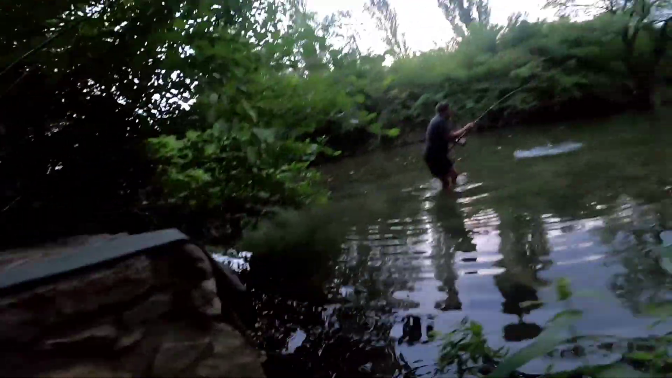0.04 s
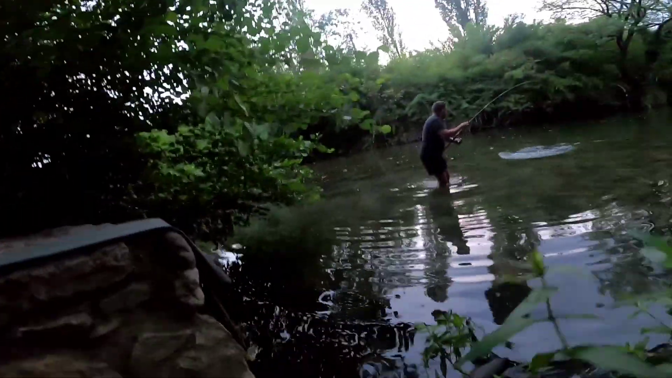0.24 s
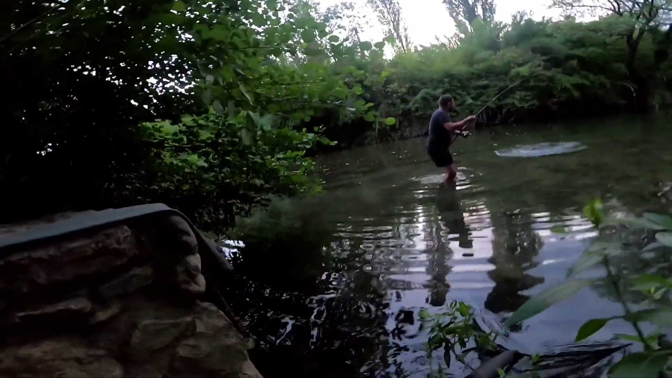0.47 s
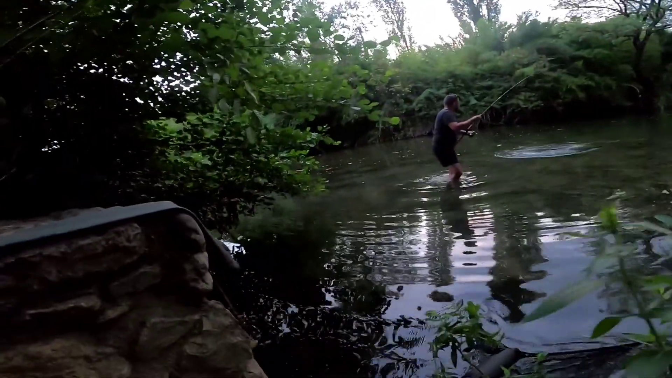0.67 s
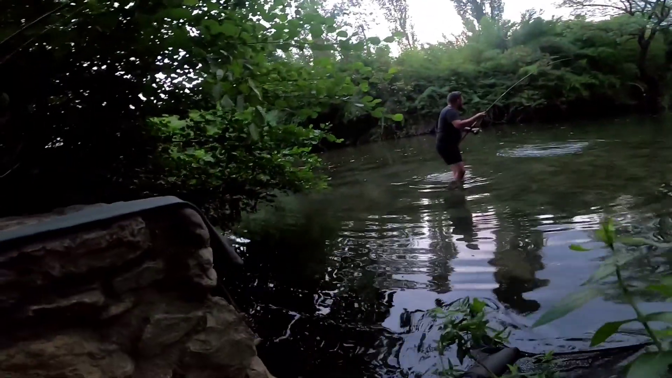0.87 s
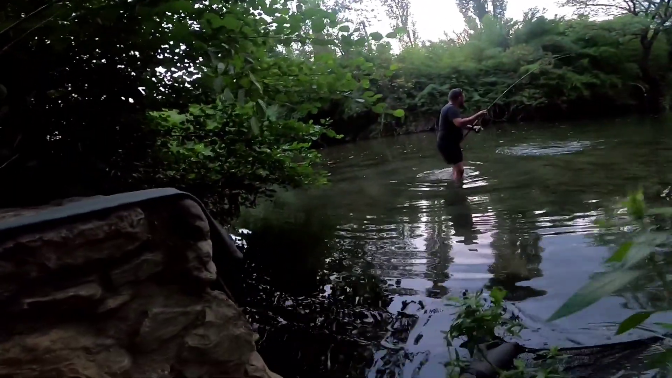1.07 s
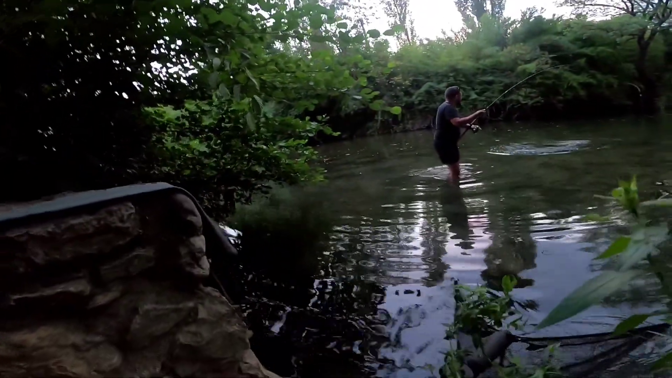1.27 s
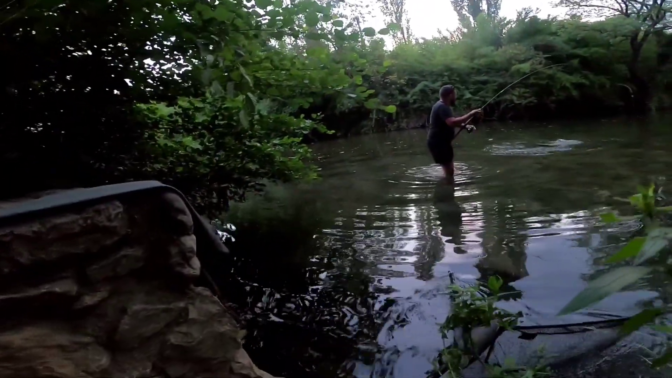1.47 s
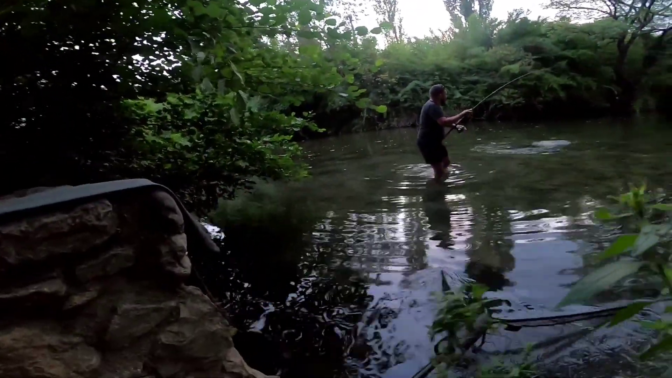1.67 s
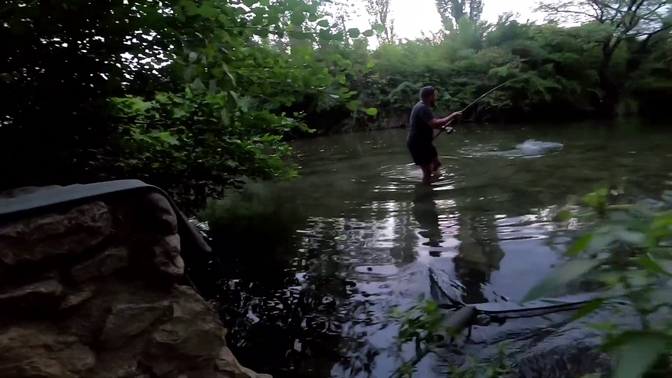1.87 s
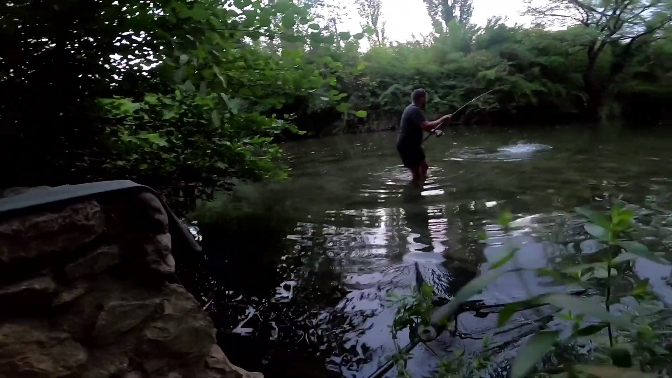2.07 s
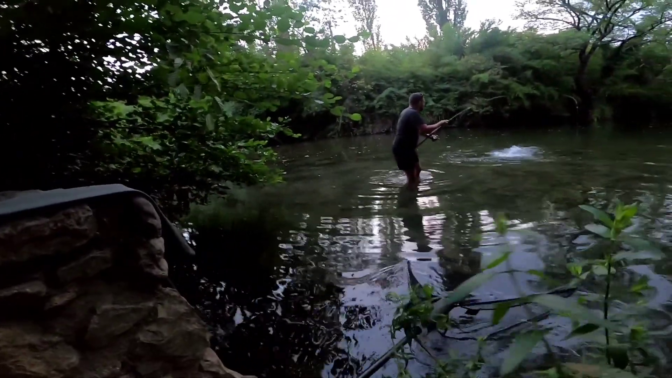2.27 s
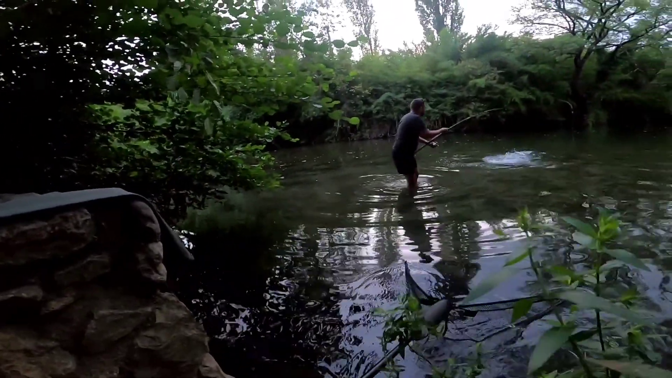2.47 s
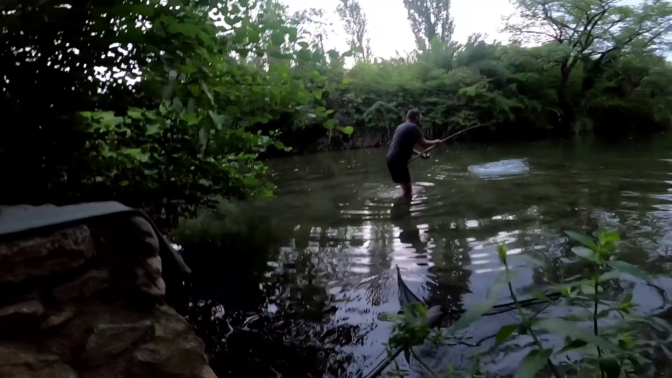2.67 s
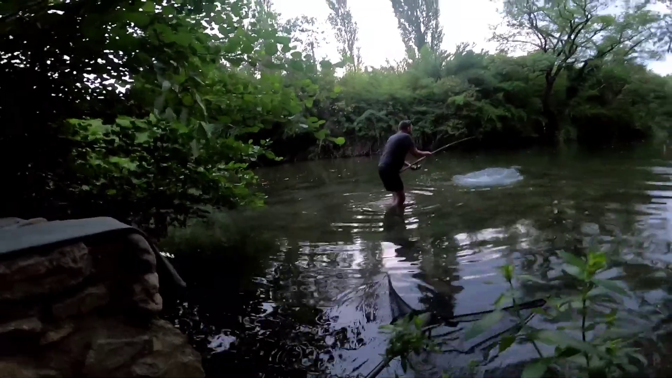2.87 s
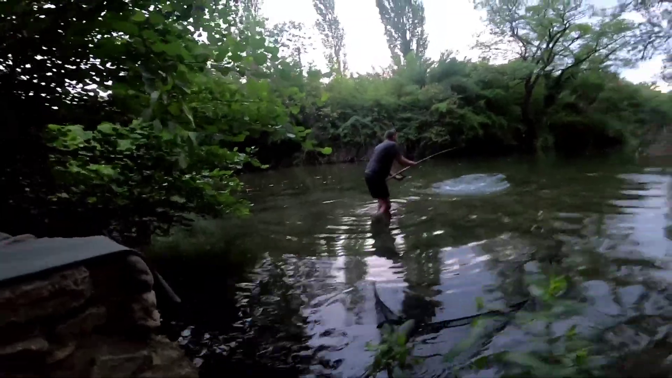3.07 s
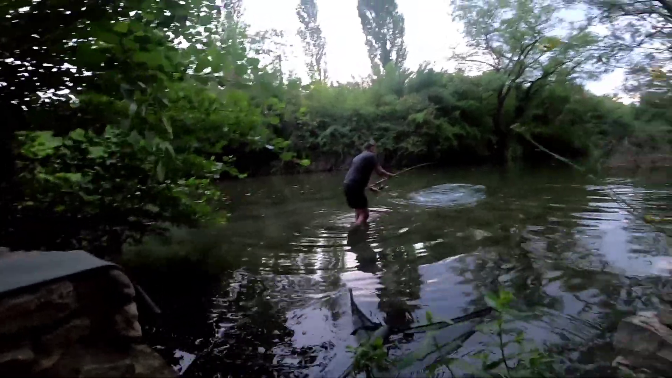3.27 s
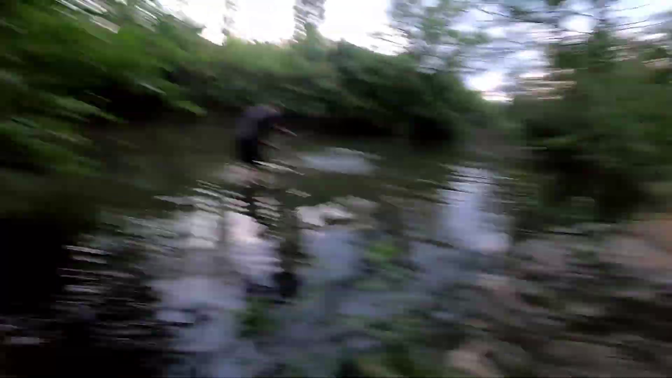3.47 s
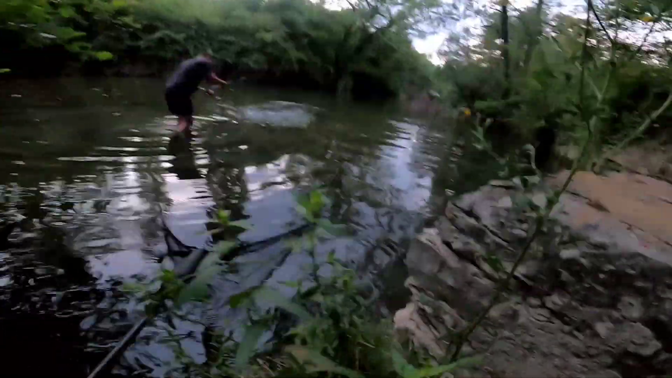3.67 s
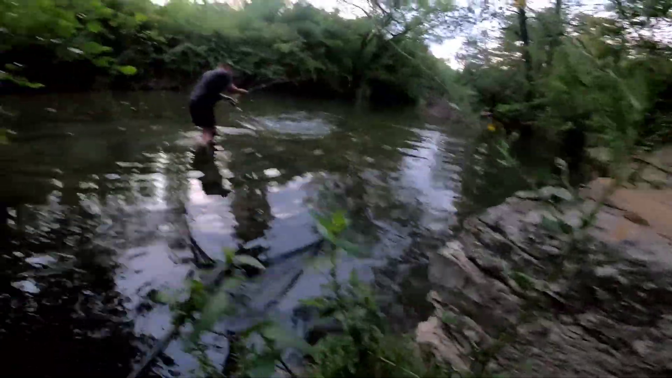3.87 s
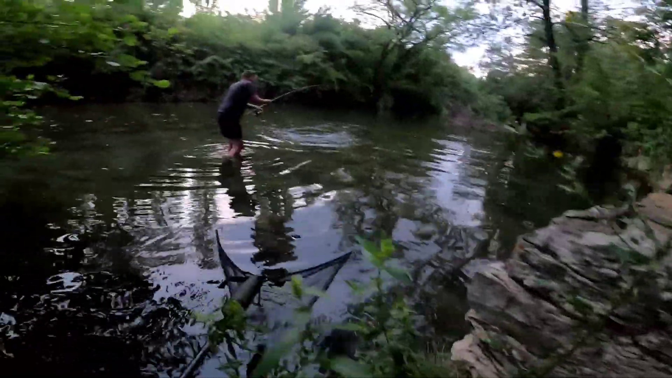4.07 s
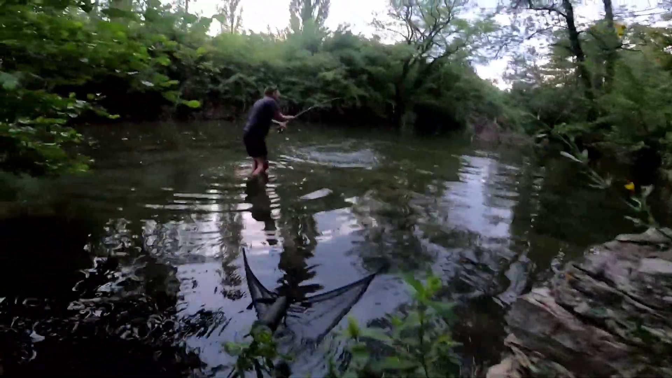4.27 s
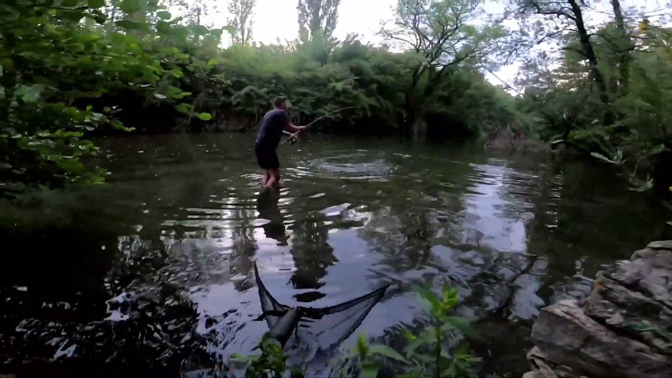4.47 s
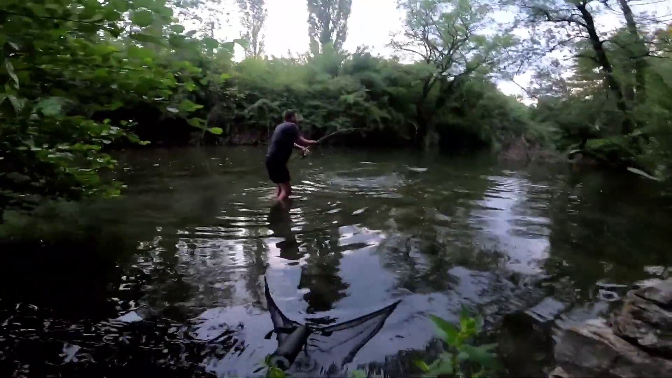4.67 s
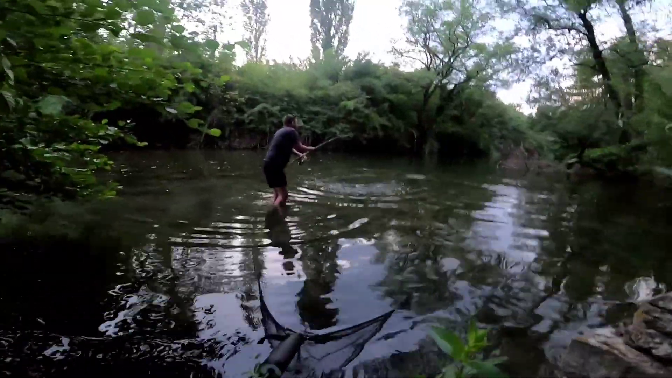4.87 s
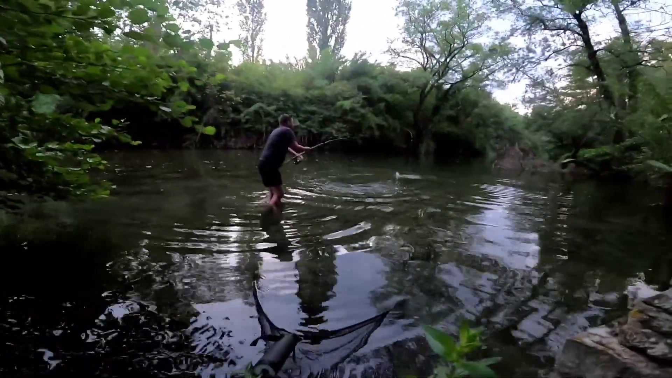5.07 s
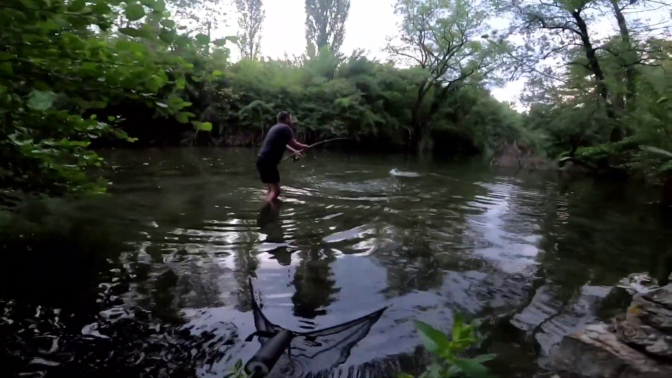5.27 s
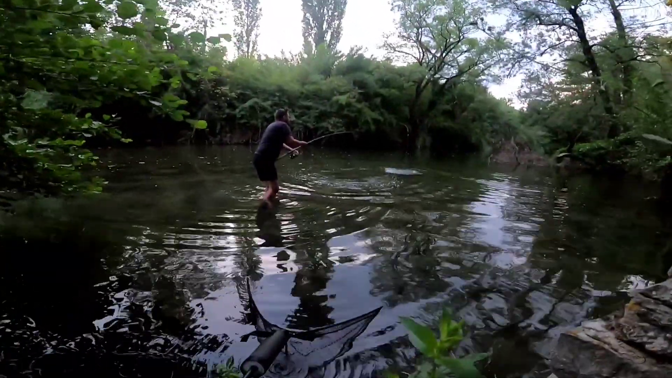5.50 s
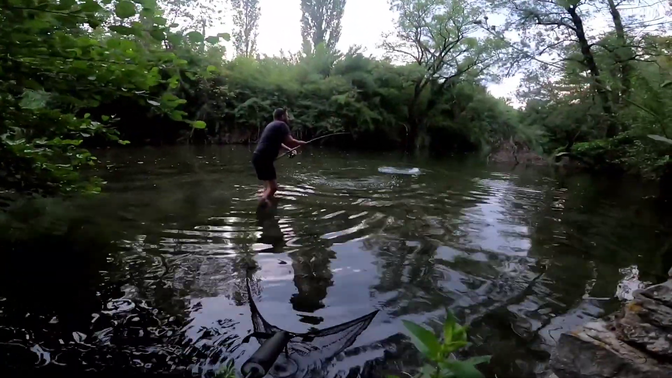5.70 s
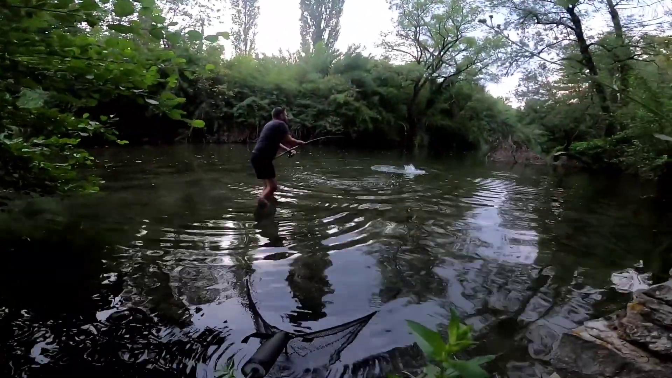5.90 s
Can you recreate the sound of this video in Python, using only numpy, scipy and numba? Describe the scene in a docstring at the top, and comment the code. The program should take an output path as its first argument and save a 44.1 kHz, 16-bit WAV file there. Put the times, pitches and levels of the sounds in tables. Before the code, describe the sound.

Outdoors on a wooded riverbank, a hooked fish churns the water: light splashes and plops first, a heavy thrash with deep gulps around two seconds, a lull of insects, then renewed splashing with brief reel clicks. Rhythmic cicada phrases come first from the right, later in front. Wind thumps the stereo microphone, mainly early on.

```python
"""A hooked fish thrashes in a river pool by a wading angler: swarms of ringing bubbles follow surges and plunges,
with single plops and low gulps on top. Beside the pool a reel's ratchet slips: clicks ring its spool.
Wind noise rumbles on the microphone ports and short knocks tick on the housing.
Two cicadas on the bank sing in short phrases: clicks through body resonances. Farther off are a droning cicada,
a ticking bush cricket, two choirs of buzzing noise bands and a flickering valley bed."""
import sys
import numpy as np
from scipy import signal
from scipy.io import wavfile
from scipy.ndimage import uniform_filter1d
from numba import njit

SR = 44100
rng = np.random.default_rng(int(sys.argv[2]) if len(sys.argv) > 2 else 0)


def file_out(sig):
    """Save sig as 16-bit WAV at sys.argv[1]."""
    # one column per channel
    cols = np.atleast_2d(sig).T
    # limit, then scale
    lim = np.clip(cols, -1, 1)
    pcm = np.round(lim * 32767).astype(np.int16)
    wavfile.write(sys.argv[1], SR, pcm)


N = 261954  # length in samples


def undb(db):
    """Amplitude from decibels."""
    return 10 ** (np.asarray(db) / 20)


def unit(x):
    """Scale to an RMS of 1."""
    return x / np.sqrt(np.mean(x ** 2))


def curve(rows):
    """Columns of a table as sample-rate curves; the first column is t/s."""
    s, *columns = np.transpose(rows)
    return [np.interp(np.arange(N) / SR, s, column) for column in columns]


def pan(x, db):
    """Level difference between the ports, left minus right in dB."""
    return x * undb(np.array([db / 2, -db / 2]).reshape(2, -1))


@njit
def svf(x, g, k):
    """State-variable band-pass, gain 1 at a centre that may move."""
    y, b, l = np.empty(len(x)), 0., 0.
    for i in range(len(x)):
        v = (b + g[i] * (x[i] - l)) / (1 + g[i] * (g[i] + k[i]))
        b = 2 * v - b
        l += 2 * g[i] * v
        y[i] = k[i] * v
    return y


def band(x, hz, width):
    """Steep band: the resonance applied twice."""
    g = np.tan(np.pi * hz / SR) + np.zeros(N)
    k = width / hz + np.zeros(N)
    return svf(svf(x + 1e-18, g, k), g, k)


@njit
def rings(rows, life, length):
    """Damped sines that swell, glide in pitch and end life t60s after the swell.

    Rows: t/s, left, right, f/Hz, t60/s, rise/octaves per 10 ms, swell/s."""
    out = np.zeros((2, length))
    for s, left, right, hz, t60, rise, swell in rows:
        start, phase, end = int(s * SR), 0., t60 * life + swell
        for j in range(min(int(end * SR), length - start)):
            t = j / SR
            # the glide goes at most an octave above the named pitch
            phase += 2 * np.pi * hz * min(2 ** (rise * (t - t60 / 8) / .01), 2.) / SR
            onset = np.sin(np.pi / 2 * min(t / swell, 1.)) ** 2
            decay = np.exp(-6.9 * max(t - swell, 0.) / t60)
            a = np.sin(phase) * decay * onset * (1 - (t / end) ** 4)
            out[0, start + j] += left * a
            out[1, start + j] += right * a
    return out


def walk(rate):
    """Random levels held 1 / rate s and slewed twice; spread about 0.75."""
    k = int(SR / rate)
    steps = np.repeat(rng.standard_normal(N // k + 1), k)
    return 1.01 * uniform_filter1d(uniform_filter1d(steps, k), k)[:N]


def clicks(rate, jitter, scatter_db, pattern_db):
    """A click train with uneven gaps and sizes, repeating a loudness pattern."""
    chance = rng.standard_normal((int(N / SR * rate * 1.1), 2))
    gaps = np.clip(1 + jitter * chance[:, 0], .1, 3)
    at = (np.cumsum(gaps) * SR / rate).astype(int)
    size = undb(scatter_db * chance[:, 1] + np.resize(pattern_db, len(at)))
    return np.bincount(at[at < N], size[at < N], N)


def swells(s, db, rise_db_per_s, t60):
    """Envelopes that climb to each peak and die away, straight in dB, summed as power."""
    t, power = np.arange(N) / SR, np.zeros(N)
    for at, top, fade in np.broadcast(s, db, t60):
        # from 60 dB below the peak to 60 dB below it again
        near = slice(max(int((at - 60 / rise_db_per_s) * SR), 0), int((at + fade) * SR))
        late = t[near] - at
        slope_db = np.where(late < 0, rise_db_per_s * late, -60 * late / fade)
        power[near] += undb(2 * (top + slope_db))
    return np.sqrt(power)


def water():
    """The pool: churned swarms of bubbles, single ringing bubbles with their surface ticks, and gulps."""
    left, right = pan(churn() + plops() + gulps(), -2)
    # the pool lies a little to the right, so the left port hears it three samples late
    return np.array([np.roll(left, shift=3), right])


def churn():
    """Froth and spray follow the surges in clumps; large cavities follow the plunges of the body."""
    # surges of churned water: t/s, froth level/dB, depth/0-1 (a few reach above 1),
    # spray against froth/dB, t60/s
    surges = [(0.0, -52.5, 0.58, -7, 0.97), (0.26, -56.5, 0.2, 1.5, 0.46), (0.324, -53.5, 0, -6, 0.96),
              (0.421, -54, 0.2, -10, 0.36), (0.5, -76, .2, 5, 0.52), (1.452, -57.5, 0.26, 7.5, 0.21),
              (1.518, -57.5, 0.58, -4, 0.66), (1.59, -72, 0.6, -10, 0.41), (1.69, -61, 0.2, 3, 1.3),
              (1.76, -54.5, 0.8, -6, 0.66), (1.819, -61, 0.7, -8, 0.2), (1.908, -47.5, 0.6, -4, 2.9),
              (1.985, -41.5, 1.0, -3, 1.6), (2.044, -40, 0.6, -17, 1.4), (2.126, -44, 1, -9, 1.1),
              (2.19, -41.5, 0.99, -2.5, 1.3), (2.34, -50.5, 0.5, -2, 1.4), (2.43, -45, 0.5, 0.5, 0.63),
              (2.497, -41.5, 0.95, -7, 0.6), (2.58, -48, 0.4, 0.5, 0.94), (2.65, -48, 0.5, -10, 0.44),
              (2.734, -51.5, 0.96, -8, 0.3), (2.83, -53.5, 0.6, -7, 1.3), (2.95, -59, 0.3, 3, .9),
              (3.04, -60.5, 0.9, 8.5, 0.4), (3.14, -59.5, 0.6, 9, 0.79), (4.742, -60, 0.1, -12, 0.98),
              (4.85, -57, 0.96, 6, 0.19), (4.995, -64.5, 0.78, -6, 0.67), (5.152, -48, 0.3, 2, 0.75),
              (5.235, -46.5, 1, 0.5, 0.27), (5.274, -42, 0.92, -0.5, 0.66), (5.33, -51, 0.7, -15, 0.38),
              (5.44, -51, 0.8, -0.5, 0.67), (5.55, -56, 0.76, -14, 0.5), (5.696, -47, 0.74, -6.5, 0.69),
              (5.745, -50.5, 0.95, -1, 1.4), (5.843, -50.5, 0.97, -1, 0.58), (5.917, -43, 1.01, 3.5, 0.88),
              (5.94, -52, 1.1, -7, .6)]
    # plunges that open large cavities: t/s, level/dB, t60/s
    plunges = [(0.0, -77, 0.54), (1.488, -78, 0.15), (1.69, -58, 0.27), (1.875, -52, .2), (1.92, -41, .8),
               (2.01, -32, 0.42), (2.07, -40, 0.6), (2.21, -41, 0.65), (2.36, -52, .6),
               (2.489, -53.5, 0.63), (2.734, -49, 0.18), (4.742, -56, .5), (4.854, -75, 0.22),
               (5.274, -53, 0.35), (5.34, -57, 0.22), (5.739, -44.5, 0.27), (5.918, -44.5, .4)]
    surge_rise_db_per_s, plunge_rise_db_per_s = 426, 309
    clump_db, clumps_per_s = 2.1, 28
    s, db, depth, spray_db, t60 = np.transpose(surges)
    coarse_db = -31 + 33 * depth  # deeper surges trap more of the larger air pockets
    fine, coarse, spray = (
        swells(s, db + share_db, surge_rise_db_per_s, t60) * undb(clump_db * walk(clumps_per_s))
        for share_db in (0, coarse_db, spray_db))
    s, db, t60 = np.transpose(plunges)
    cavity = swells(s, db, plunge_rise_db_per_s, t60)
    return (fine * swarm(600, 926.0, 1724.0, 23.9, 1.9, -5.5)
            + coarse * swarm(300, 348.0, 814.0, 15.6, 1.9, -5.0)
            + cavity * swarm(130, 136.0, 297.3, 23.0, 0.57, -12.0)
            + spray * swarm(1600, 1960.0, 3380.0, 10.8, 2.4, -7))


def swarm(rate, low_hz, high_hz, cycles, spread_db, hiss_db):
    """Random bubbles of one size class, scattered over the pool, on a hiss of the same band."""
    width_db = 1.5  # greatest scatter to either side on each port
    u = rng.random((int(rate * N / SR), 6))
    hz = low_hz * (high_hz / low_hz) ** u[:, 1]
    size = undb(-spread_db * np.log(1 - u[:, 2]))
    t60 = cycles * (.5 + u[:, 3]) / hz
    rise = 0.018 * u[:, 4] / t60
    side = undb(width_db * (2 * u[:, 5] - 1))
    rows = np.column_stack([u[:, 0] * N / SR, size * side, size / side, hz, t60, rise, 1.86 / hz])
    grains = rings(rows, 0.77, N)
    centre_hz, hiss_hz = np.sqrt(low_hz * high_hz), 1.4 * (high_hz - low_hz)
    mid, wide = (band(rng.standard_normal(N) * undb(2.1 * walk(60)), centre_hz, hiss_hz) for _ in range(2))
    hiss = mid + 0.29 * wide * np.array([[1], [-1]])
    return unit(unit(grains) + undb(hiss_db) * unit(hiss))


def plops():
    """Single bubbles ring as trapped air pulsates; the drop that makes each one ticks on the surface."""
    # single bubbles: t/s, level/dB, f/Hz, rise/octaves per 10 ms, t60/s
    bubbles = [(0.015, -53, 506, -0.011, 0.075), (0.074, -42.5, 1300, 0.048, 0.04),
               (0.085, -46, 1400, 0.37, 0.033), (1.053, -38, 2650, 0, .015),
               (0.17, -50.5, 950, 0.017, 0.05), (0.245, -48, 1080, -0.085, 0.053),
               (0.27, -53, 1355, 0.58, 0.036), (0.304, -42, 1150, 0.56, 0.051),
               (0.325, -39.5, 1124, 0.16, 0.075), (0.343, -45, 2320, 0.58, 0.021),
               (0.352, -43.5, 987, 0.27, 0.064), (0.277, -54, 870, -0.23, 0.037),
               (0.3844, -43, 2160, 0.13, 0.029), (0.418, -28, 916, 0.59, 0.04),
               (0.444, -43, 892, 0.06, 0.158), (0.469, -38.5, 3020, -0, .03), (0.479, -42, 3550, .1, .025),
               (0.491, -50, 1005, -0.2, 0.043), (0.557, -35, 2750, -0.031, .03),
               (0.5747, -41, 2650, .06, 0.036), (0.667, -46, 1490, .05, 0.024),
               (0.674, -48.5, 1074, -0.16, 0.061), (0.9937, -33, 3750, .5, 0.02),
               (1.014, -36, 2290, 0, 0.035), (1.0136, -31.5, 3730, -0.15, 0.021),
               (1.154, -55, 1080, -0.033, .08), (1.25, -39.5, 1364, 0.41, 0.047),
               (1.31, -42.5, 883, -0.055, 0.055), (1.379, -44.5, 2210, .06, 0.041),
               (1.4242, -42.5, 2300, 0.06, .036), (1.446, -45, 3040, -0.037, .044),
               (1.513, -32.5, 1126, 0.15, 0.059), (1.535, -51, 860, 0.035, .09),
               (1.59, -40.5, 1495, -0.00022, .044), (1.632, -49, 1030, -0.039, .06),
               (1.445, -49, 2500, 0.097, .03), (1.448, -51, 1010, 0, 0.054), (1.556, -48, 1270, 0.2, 0.024),
               (1.574, -55, 500, -0.084, .06), (1.605, -56, 525, 0.1, 0.053), (1.742, -48, 1440, 0, .04),
               (1.764, -46, 1040, 0.022, 0.051), (1.785, -45, 1046, -0.13, 0.058),
               (1.806, -44, 502, -0.034, 0.086), (1.817, -43, 888, -0.13, 0.072),
               (1.88, -44, 1650, -.03, 0.05), (1.913, -40.5, 1052, 0.069, .06),
               (1.963, -42, 1216, -0.15, 0.089), (1.999, -37.5, 1480, -0.024, 0.082),
               (2.058, -32, 1456, 0.12, 0.048), (2.106, -35, 931, 0.064, .04),
               (2.135, -34, 992, 0.068, 0.06), (2.209, -36, 930, 0.1, 0.044),
               (2.262, -36.5, 656, -0.043, 0.1), (2.335, -40, 944, .01, 0.095),
               (2.395, -34, 859, -0.084, .04), (2.435, -40, 1047, 0.06, 0.054),
               (2.468, -32.5, 740, 0.13, 0.09), (2.478, -35, 560, -0.11, 0.084),
               (2.58, -46, 1400, .03, .06), (2.621, -41.5, 814, 0.22, 0.076),
               (2.849, -38, 1020, -0.13, 0.036), (2.875, -46, 1530, .03, 0.067),
               (2.929, -53, 1080, -0, .05), (2.942, -48, 1500, -0.098, .04),
               (2.976, -48, 1520, 0.08, 0.075), (3.016, -45, 1430, -0.22, .04),
               (3.131, -46, 1560, -0.03, .04), (3.15, -52, 1006, .02, 0.071),
               (5.142, -34.5, 1330, -0.099, .05), (5.159, -36, 1030, 0.06, .08),
               (5.183, -36, 650, -0.098, 0.062), (5.319, -37, 1003, -0, 0.1), (5.39, -46, 1000, 0.2, 0.042),
               (5.427, -41.5, 1870, 0.14, 0.045), (5.45, -46, 1150, 0.09, 0.054),
               (5.484, -41.5, 1386, 0.43, .04), (5.59, -52, 790, -.03, .05),
               (5.622, -49, 1510, -0.14, 0.043), (5.646, -47, 1960, -0.1, .04),
               (5.688, -40, 1255, -0.034, 0.09), (5.69, -45, 2270, 0.2, .03),
               (5.74, -37.5, 1250, 0.097, 0.046), (5.908, -32, 1410, 0.29, 0.04),
               (1.85, -36.5, 255, 0.036, 0.051), (2.009, -31.5, 113, -0.13, 0.11),
               (2.033, -31.5, 1137, 0.091, 0.094), (2.171, -29.5, 482, -0.072, 0.16),
               (2.195, -29, 377, -0.18, 0.066), (2.281, -35, 1010, .1, 0.083),
               (2.3391, -33.5, 2510, -0.0038, 0.022), (2.524, -34, 1017, 0.13, 0.077),
               (2.718, -35.5, 560, 0.14, 0.089), (2.758, -36.5, 1026, 0.11, 0.056),
               (2.7921, -32.5, 1920, 0.016, 0.046), (2.824, -42.5, 1070, .13, 0.069),
               (2.8754, -41, 2160, -0.037, 0.052), (3.352, -36, 1237, -0.04, 0.07),
               (4.0731, -38.5, 2940, 0.1, 0.018), (4.225, -32, 1745, -0.018, 0.041),
               (4.2333, -36.5, 2250, 0.98, 0.023), (4.238, -41.5, 1455, 0.21, 0.058),
               (4.6054, -39.5, 2590, 0.0078, 0.036), (4.775, -52, 598, -0.1, 0.093),
               (4.82, -43.5, 301, .011, 0.2), (4.996, -42, 1315, -0.031, 0.029),
               (5.02, -44.5, 1506, 0.04, 0.052), (5.195, -36, 1027, -0.13, 0.046),
               (5.232, -34.5, 640, -0.17, 0.074), (5.265, -33.5, 1380, 0.056, 0.069),
               (5.28, -25.5, 351, 0, 0.092), (5.565, -43, 1630, -0.012, .04),
               (5.688, -32.5, 1777, -0.08, 0.051), (5.734, -29, 603, -0.1, 0.039),
               (5.748, -33.5, 522, -0.07, 0.037), (5.841, -34, 1384, 0.031, 0.028),
               (5.909, -32, 1013, -0.028, 0.064), (5.924, -28, 410, -0.07, 0.087)]
    s, db, hz, rise, t60 = np.transpose(bubbles)
    # 2.4 ms at 1 kHz without a rise; larger bubbles swell slower, quick risers longer
    swell = 0.0024 * (1000 / hz) ** 0.95 * (1 + 3.94 * rise)
    size = undb(db)
    # each ring ends half a t60 after its swell
    single = rings(np.column_stack([s, size, size, hz, t60, rise, swell]), 0.5, N)[0]
    single = single * undb(2.5 * walk(140))  # the level flutters
    tick_size, tick_hz, tick_cycles = undb(db - 8.5), 1.54 * hz, 17
    tick_rows = np.column_stack([s, tick_size, tick_size, tick_hz, tick_cycles / tick_hz,
                                 0 * s, 0.33 / tick_hz])
    return single + rings(tick_rows, .6, N)[0]


def gulps():
    """Large air pockets open and close: low tones that swell and fade while the pocket changes size."""
    # gulps: start t/s, length/s, peak level/dB before the wobble, first f/Hz, last f/Hz
    pockets = [(1.901, 0.065, -34.5, 199, 164), (1.943, 0.029, -38, 190, 285),
               (1.979, 0.077, -29, 253.4, 141), (2.056, 0.054, -34, 160, 176),
               (2.125, 0.046, -41, 151, 152), (2.165, 0.08, -35.5, 163, 159),
               (2.232, 0.07, -39.5, 155.5, 149), (2.325, 0.052, -46, 173, 161),
               (2.448, 0.087, -37.5, 163.6, 161), (5.157, 0.053, -42, 520, 290),
               (5.243, 0.057, -37, 242, 204), (5.29, 0.048, -39, 497, 790), (5.393, 0.032, -46.5, 407, 630),
               (5.469, 0.062, -55, 384, 356), (5.705, 0.069, -35.5, 145.6, 158),
               (5.76, 0.054, -38.5, 201, 480), (5.844, 0.048, -42, 685, 434),
               (5.857, 0.034, -41.5, 383, 220), (5.899, .055, -37, 111, 98)]
    bend = 1.22  # above 1 the pitch moves late
    out, wobble = np.zeros(N), undb(2.5 * walk(70))
    for s, length, db, first_hz, last_hz in pockets:
        start = int(s * SR)
        along = np.arange(min(int(length * SR), N - start)) / (length * SR)
        hz = first_hz * (last_hz / first_hz) ** (along ** bend)
        tone = np.sin(2 * np.pi * np.cumsum(hz) / SR)
        out[start:start + len(along)] += undb(db) * np.sin(np.pi * along) * tone
    return out * wobble


def reel():
    """The pawl skips over the teeth and each click rings the spool."""
    # slips of the ratchet: start t/s, end t/s, first clicks per s, last clicks per s, relative level/dB
    slips = [(4.288, 4.347, 95, 35, -53), (5.14, 5.342, 98, 98, -46), (5.842, 5.94, 110, 95, -44.5)]
    out = np.zeros(N)
    for start, end, first, last, db in slips:
        teeth = np.cumsum(np.geomspace(first, last, int((end - start) * SR))) / SR
        at = np.searchsorted(teeth, np.arange(teeth[-1]))
        at = np.minimum(int(start * SR) + at, N - 1)
        scatter_db = 1.1 * rng.standard_normal(50)[:len(at)]
        out[at] += undb(db + scatter_db) * np.sqrt(SR / first)
    return pan(5.5 * band(out, 2790, 355) + 0.25 * band(out, 9600, 3000), -.5)


def wind():
    """Slow pressure eddies, unrelated on the two ports; hard gusts add a higher, lumpy edge."""
    # gusts on the ports: t/s, rumble level/dB, left minus right/dB, hard edge level/dB
    gusts = [(0.0, -40, 4, -56), (0.74, -56, 9, -92), (1.201, -42, 9, -39.5), (1.236, -27, 1, -35),
             (1.275, -33, 5, -31), (1.33, -31, -5, -56), (1.38, -37.5, 14, -56),
             (1.477, -33.5, 12.5, -42.5), (1.64, -45, 16, -70), (1.713, -31, 10.5, -38.5),
             (1.79, -35.5, 2, -59), (2.719, -67, 7, -58), (2.81, -57, 3, -85), (3.18, -54, 9, -90),
             (3.46, -47, 4, -80), (3.51, -48, 2, -78), (3.57, -36.5, 4.5, -60), (3.66, -42, 7, -70),
             (3.73, -50, 10, -77), (3.9, -53, 3, -78), (4.09, -51, 9, -89), (4.32, -52.5, 0, -85),
             (4.83, -40, 5, -50.5), (4.92, -49, -4, -80), (5.03, -47.5, 4, -90), (5.48, -54, 8, -88),
             (5.589, -58, 5, -87), (5.94, -54, 0, -92)]
    gust_rise_db_per_s, gust_t60_s = 448, 0.24
    edge_rise_db_per_s, edge_t60_s = 600, 0.15
    breeze_db, breeze_pan_db, breeze_waver_db = -66.5, 1.5, -2
    rattle_db = -9  # the edge's upper rattle against its lower part

    def eddy(hz, width, lumps_db):
        """Noise in one band with a lumpy level."""
        return unit(band(rng.standard_normal(N) * undb(lumps_db * walk(24.78)), hz, width))

    s, db, pan_db, edge_db = np.transpose(gusts)
    out = []
    for side in (.5, -.5):
        breeze = undb(breeze_db + side * breeze_pan_db + breeze_waver_db * walk(12))
        slow = np.hypot(breeze, swells(s, db + side * pan_db, gust_rise_db_per_s, gust_t60_s))
        edge = swells(s, edge_db + side * pan_db, edge_rise_db_per_s, edge_t60_s)
        rumble = band(eddy(25, 26.6, 2.1), 25.6, 41)
        rough = eddy(68, 47, 3.1) + undb(rattle_db) * eddy(150, 56, 4.9)
        out.append(slow * rumble + edge * rough)
    return np.array(out)


def ticks():
    """Short knocks on the housing: damped tones falling in pitch."""
    # ticks close to the microphone: t/s, level/dB, f/Hz, left minus right/dB
    knocks = [(0.861, -45, 1500, 5), (0.862, -49.5, 258, -2), (2.713, -35.5, 565, -16),
              (3.689, -32.5, 1490, 19), (3.69, -41, 940, 5), (3.733, -30, 3800, 6), (4.735, -40, 1500, -5),
              (4.822, -42, 300, -9), (4.826, -36, 1800, -5), (3.557, -43, 193, -1.5),
              (3.694, -46.5, 293, -3)]
    s, db, hz, pan_db = np.transpose(knocks)
    left, right = undb(db + pan_db / 2), undb(db - pan_db / 2)
    return rings(np.column_stack([s, left, right, hz, 7 / hz, -.0015 * hz, 0.72 / hz]), .6, N)


def near_cicadas():
    """Two singers on the bank, one to the right and one in front, each with its own ribs and body."""
    # phrases of each singer: t/s, length/s, level/dB at the start of the phrase
    right_phrases = [(0.004, 0.074, -52.5), (0.107, 0.075, -53), (0.218, 0.084, -51.5), (0.323, 0.085, -51),
                     (0.43, 0.078, -52.5), (0.542, 0.096, -52), (0.652, 0.095, -52.5), (0.771, 0.084, -51),
                     (0.875, 0.082, -52.5), (0.995, 0.081, -53.5), (1.096, 0.085, -53),
                     (1.201, 0.098, -54.5), (1.322, 0.085, -53.5), (1.437, 0.09, -55), (1.544, 0.074, -54),
                     (1.655, 0.084, -53), (1.762, 0.09, -54), (1.883, 0.079, -56), (1.99, 0.096, -54.5),
                     (2.11, 0.092, -55), (2.215, 0.09, -57.5), (2.316, 0.075, -59)]
    front_phrases = [(4.897, 0.079, -51), (5.008, 0.09, -50), (5.107, 0.071, -43.5), (5.221, 0.083, -42.5),
                     (5.329, 0.08, -41.5), (5.441, 0.087, -41), (5.551, 0.082, -40.5), (5.664, 0.099, -40),
                     (5.78, 0.092, -39.5), (5.897, 0.12, -42)]
    # resonances of each body: f/Hz, width/Hz, relative level/dB
    right_body = [(6033, 290, 1.5), (6450, 540, 0.5), (6920, 160, -5.5), (7830, 190, -16.5),
                  (8700, 2400, -15.5), (4490, 390, -2.5), (11700, 3100, -28)]
    front_body = [(5850, 1100, 6), (8250, 740, -12.5), (7020, 150, -3), (4570, 700, 0.5), (9300, 1700, -20),
                  (11500, 2700, -32)]
    # loudness of successive rib clicks: level/dB
    right_pattern = [0, -6, -14, -4, -10, -15]
    front_pattern = [0, -2, -4, -13]
    right_ribs = clicks(513, .05, 1.2, right_pattern)
    right = singer(right_phrases, -17.5, right_body, right_ribs, edge_s=0.0051,
                   sag_db=-2.3, sag_at=0.46, glide_hz=130, waver_db=2.1)
    front_ribs = clicks(530, 0.1, 1.5, front_pattern)
    front = singer(front_phrases, -1.5, front_body, front_ribs, edge_s=.005,
                   sag_db=10.2, sag_at=0.52, glide_hz=890, waver_db=1.4)
    return right + front


def singer(phrases, pan_db, body, ribs, edge_s, sag_db, sag_at, glide_hz, waver_db):
    """Rib clicks ring the body; the first mode glides up over the first half of each phrase."""
    t, gain, along = np.arange(N) / SR, np.zeros(N), np.ones(N)
    for s, length, db in phrases:
        inside = (t > s - edge_s) & (t < s + length + edge_s)
        along[inside] = np.clip((t[inside] - s) / length, 0, 1)
        # the level sags around sag_at of the phrase; a negative sag lifts it
        sag = sag_db / (1 + np.exp((sag_at - along) / 0.06))
        gate = np.clip(np.minimum(t - s, s + length - t) / edge_s / 2 + .5, 0, 1)
        gain += gate * undb(db - sag)
    glide = glide_hz * (np.minimum(2 * along, 1) - .5)
    song = 0
    for k, (hz, width, db) in enumerate(body):
        mode = unit(band(ribs, hz + glide * (k == 0), width))
        song = song + undb(db + waver_db * walk(30)) * mode
    return pan(gain * unit(song), pan_db)


def drone():
    """A far cicada: fast clicks in a sharp resonance blur into a rough, wavering tone."""
    # the slowly wandering drone: t/s, level/dB, f/Hz
    drone_rows = [(2.6, -73, 6300), (2.95, -53, 6230), (3.14, -55, 6220), (3.3, -61, 6240),
                  (3.53, -57, 6190), (3.7, -59, 6150), (4.0, -59, 6230), (4.22, -50.5, 6340),
                  (4.4, -54, 6305), (4.8, -63, 6370), (5.0, -75, 6400)]
    db, hz = curve(drone_rows)
    tone = unit(band(clicks(520, 0.54, 2.0, [0]), hz + 20 * walk(6), 95))
    return pan(undb(db + 2.0 * walk(10.96)) * tone, -1.8)


def ticker():
    """A bush cricket: short wing scrapes, two strong and one faint, over a thin rasp."""
    # its scrapes: t/s, level/dB of the main wing mode, its f/Hz, upper mode against it/dB
    wing_rows = [(0, -78, 10600, 0), (.6, -71, 10500, -2), (1.1, -77, 10600, -9), (1.45, -73, 10700, -6),
                 (2, -79.5, 10500, -9), (3.3, -78, 10500, -14), (3.7, -72.5, 10500, -9),
                 (4.3, -68.5, 10400, -6), (4.6, -72, 9900, -12), (5, -70, 10350, -6),
                 (5.94, -71.5, 10300, -10)]
    db, hz, upper_db = curve(wing_rows)
    scrape = uniform_filter1d(clicks(45.3, 0.06, 2.2, [0, -2, -12]), size=380)
    scrape = (scrape + 0.00083) * rng.standard_normal(N)  # the constant is the rasp
    wing = unit(band(scrape, hz, 1200)) + undb(upper_db) * unit(band(scrape, 12100, 800))
    return pan(undb(db) * wing, 8.5)


def far_chorus():
    """A low and a high choir of distant insects."""
    # each choir: t/s, level/dB, left minus right/dB
    low_rows = [(0, -52, 4), (1.1, -50, 3), (1.5, -54, 9), (1.85, -51.5, 5), (2.4, -48.5, 0.5),
                (3.0, -49.5, 1), (3.6, -49.5, 2.5), (4.3, -48, 1.5), (4.7, -48.5, 1.5), (5.25, -48, 1.5),
                (5.6, -52, 3), (5.94, -45, 1.5)]
    high_rows = [(0, -62, 23), (1, -66, 26), (2, -62, 20), (2.5, -52, -2.5), (3, -54.5, -5),
                 (3.5, -51.5, -1), (4, -54, -1), (4.85, -52, -3), (5.3, -54, 0), (5.94, -51, 2)]
    low = choir(low_rows, 4461, 485, 226, drift_hz=54, waver_db=4.2, apart_db=0.73, count=8)
    high = choir(high_rows, 6402, 387, 200, drift_hz=39, waver_db=1.4, apart_db=2.0, count=5)
    return low + high


def choir(rows, hz, spread_hz, width, drift_hz, waver_db, apart_db, count):
    """Far insects, each buzzing in its own narrow band from its own side and wavering alone."""
    db, pan_db = curve(rows)
    out = 0
    for place, side in zip(np.linspace(-1, 1, count), rng.standard_normal(count)):
        centre = hz + spread_hz * place + drift_hz * walk(6)
        near, echo = (unit(band(rng.standard_normal(N) * undb(0.93 * walk(250)), centre, width))
                      for _ in range(2))
        voice = near + 0.57 * echo * np.array([[1], [-1]])
        # voices at the edges of the pitch range are fainter
        level = undb(waver_db * walk(12) - 3.3 * place ** 2)
        out = out + pan(level, apart_db * side) * voice
    return pan(undb(db) * unit(out), pan_db)


def valley():
    """Third-octave noise bands that flicker alone; the bass is more alike left and right."""
    # leaves, river and far insects: f/Hz, relative level/dB per Hz
    spectrum = [(59, -52), (100, -23), (168, -7), (560, -22), (760, -23), (900, -26.5), (1030, -12.5),
                (1810, -22), (2230, -3.5), (3380, -16), (4420, -4), (5560, 0), (6440, -14), (7760, -18),
                (11100, -19), (13300, -40), (14500, -25)]
    f, level_db = np.transpose(spectrum)
    out = 0
    for hz in 140 * 2 ** np.arange(0, 6.7, 1 / 3):
        mid, side = (band(rng.standard_normal(N), hz, hz / 3) for _ in range(2))
        # bands above 5 kHz flicker less
        flicker_db = (2.53 * walk(9) + 2.5 * walk(40)) * min(5000.0 / hz, 1) ** .6
        db = np.interp(np.log(hz), np.log(f), level_db) + flicker_db
        apart = min((hz / 12000.0) ** 0.22, 1)
        out = out + undb(db) * (mid + apart * side * np.array([[1], [-1]]))
    return pan(unit(out) * undb(-48), 0.64)


def banks(x, db):
    """Scattered echoes from trees and rocks: a decaying noise tail, different on each port."""
    t60_s = .22
    t = np.arange(int(.5 * SR)) / SR
    decay = np.exp(-np.log(1000) * t / t60_s) * np.clip(t / 0.0014, 0, 1)
    tail = rng.standard_normal((2, len(t))) * decay
    tail /= np.sqrt(np.sum(tail ** 2, axis=1, keepdims=True))
    return x + undb(db) * signal.fftconvolve(x.mean(axis=0)[None], tail, axes=1)[:, :N]


def scene():
    """Pool and reel echo off the banks, the nearer insects more faintly; the rest is added dry."""
    pool = banks(water() + reel(), -16)
    insects = banks(near_cicadas() + drone() + ticker(), -21)
    return pool + wind() + ticks() + insects + far_chorus() + valley()


def record(dry):
    """The microphone signal loses its highest treble in a low-pass, then its top in a steeper one."""
    dull = signal.sosfilt(signal.butter(6, 13600, fs=SR, output="sos"), dry)
    return signal.sosfilt(signal.ellip(8, .2, 70, 15300, fs=SR, output="sos"), dull)


dry = scene()
out = record(dry)
file_out(out)
```